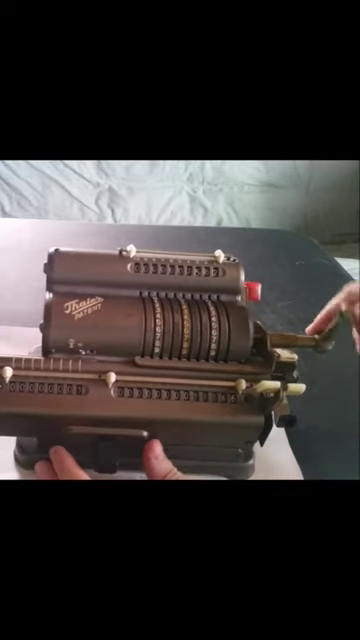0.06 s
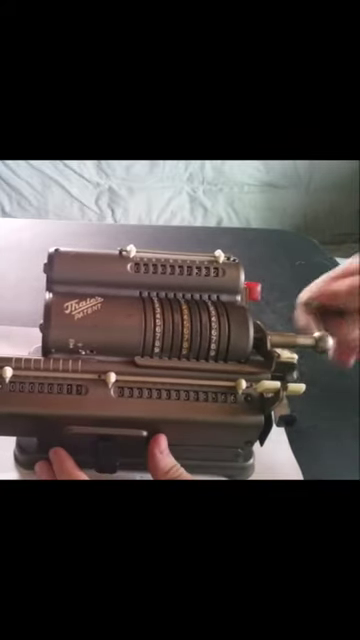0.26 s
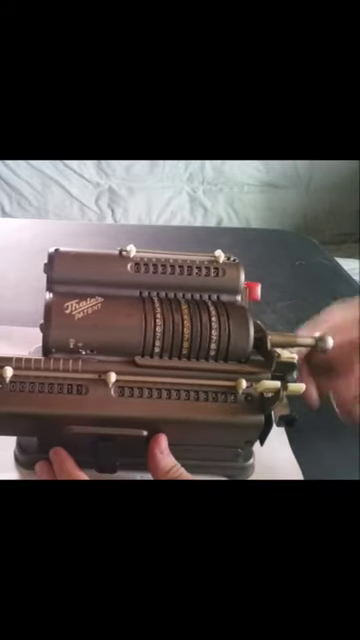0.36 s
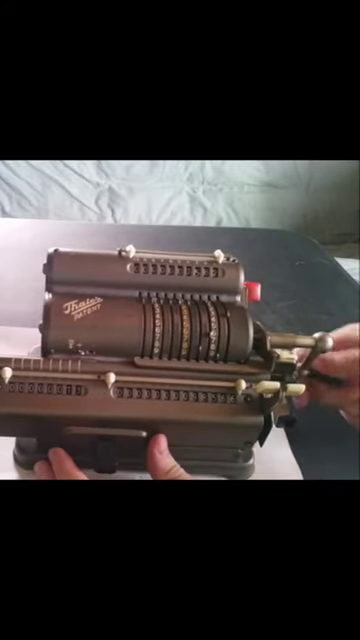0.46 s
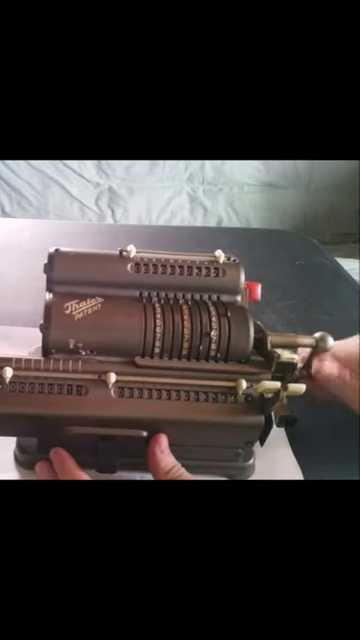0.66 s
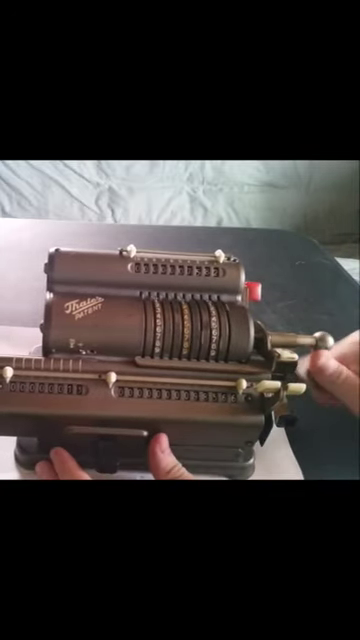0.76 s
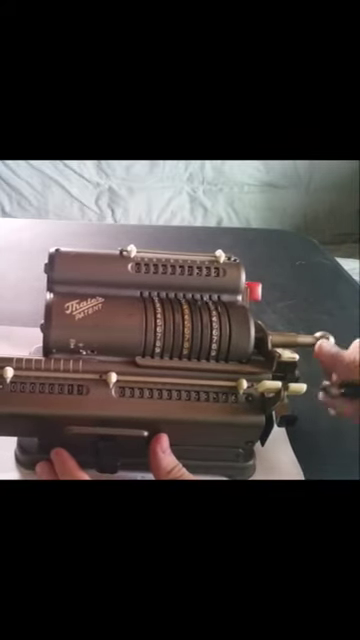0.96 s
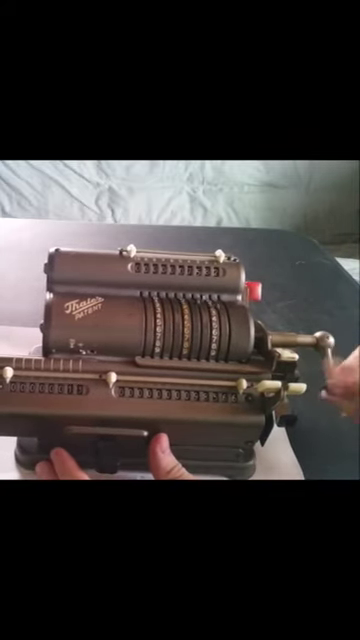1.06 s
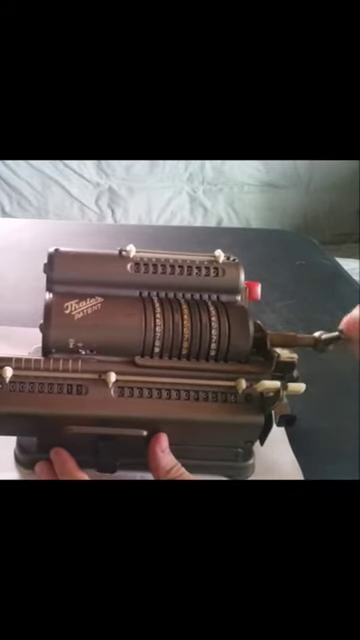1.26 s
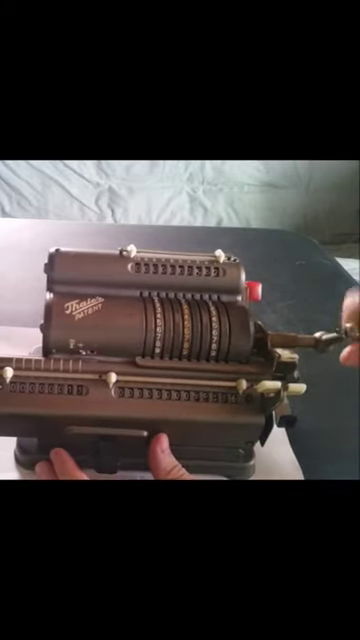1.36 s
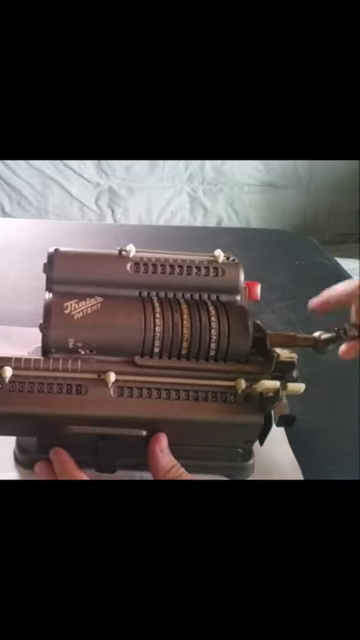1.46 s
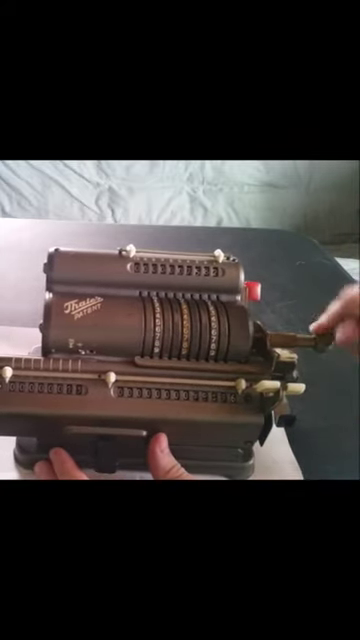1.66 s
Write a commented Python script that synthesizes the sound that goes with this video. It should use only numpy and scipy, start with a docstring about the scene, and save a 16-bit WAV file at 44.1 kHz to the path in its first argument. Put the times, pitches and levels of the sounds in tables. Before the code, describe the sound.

Close up on a desk in a quiet room, a mechanical calculator's crank turns with a quick metallic ratcheting and ends in a ringing clunk. Then come a few softer clicks and a brief scrape as the handle latches.

```python
"""Hand-cranked calculator

A mechanical calculator, close up on a desk in a small quiet room. One turn of the crank drags gears
and pawls through a dense rattle and ends in a heavy clunk against the stop; then the handle is shifted
and latched with lighter clicks. Each click is a crack of noise plus the ring of frame, casing and small
steel parts. Underneath, the hand rubs, the machine rocks on the desk and the room hums faintly."""
import sys
import numpy as np
from scipy import signal
from scipy.fft import rfft, irfft, next_fast_len
from scipy.io import wavfile
from scipy.ndimage import map_coordinates

SR = 44100
rng = np.random.default_rng(int(sys.argv[2]) if len(sys.argv) > 2 else 0)


def to_wav(sig):
    """Store sig (one row per channel, or 1-D mono) as 16-bit WAV at the path in sys.argv[1].

    Samples outside -1..1 are clipped; the rate is SR.
    """
    pcm = np.clip(np.atleast_2d(sig), -1, 1) * 32767
    pcm = np.round(pcm).astype(np.int16)
    wavfile.write(sys.argv[1], SR, pcm.T)  # frames by channels


N = 74970

# Table levels are relative; spectra give level per hertz.
# room tone: f/Hz, level/dB
AIR_SPECTRUM = [(20, 14), (123, -3), (262, 1.5), (1060, 3.5), (1400, -24), (3000, -40), (6700, -18),
                (8000, -36), (16000, -38)]
# fader ride of the rubbing hand: t/s, level/dB
RUB_ENVELOPE = [(0, -66), (.055, -60), (.17, -47), (.68, -45.5), (.76, -51), (.83, -55.5), (.86, -56.5),
                (.92, -54.5), (1.1, -51.5), (1.32, -57.5), (1.36, -53), (1.5, -54), (1.62, -55.5),
                (1.7, -60)]
# dull colour of the rub: f/Hz, level/dB
RUB_SPECTRUM = [(60, -20), (110, 0), (200, -1.5), (320, -4.5), (520, -8.5), (1020, -3.5), (1400, -15.5),
                (4500, -26.5), (7300, -22.5), (9000, -39), (15000, -34.5)]
# pawl, lever and latch clicks: t/s, steel/dB, frame/dB, casing/dB, sizzle/dB, casing pitch/Hz
CLICKS = [(0.0903, -56, -40, -37.5, -82, 910), (0.1074, -34.5, -42, -36, -70, 1000),
          (0.1395, -48, -41, -37, -70, 820), (0.1897, -29, -32, -32.5, -47, 1560),
          (0.199, -28.5, -34, -32.5, -33, 890), (0.2372, -27, -27.5, -24.5, -27, 770),
          (0.2448, -29, -30.5, -24, -29, 810), (0.27, -26.5, -64, -27, -25, 990),
          (.302, -39, -38, -40, -27.5, 750), (.329, -28, -51, -34, -27, 840),
          (0.337, -35, -31.5, -24, -43, 886), (0.3581, -31.5, -27, -24.5, -31, 920),
          (.3774, -35, -26.5, -27, -27.5, 730), (0.3911, -27, -42, -28, -44, 780),
          (0.44, -54, -31, -33.5, -40, 680), (.449, -52, -31.5, -25, -38, 784),
          (.4608, -24, -34.5, -33, -27.5, 730), (0.5269, -52, -35, -30.5, -62, 1000),
          (.541, -35, -40, -30, -34, 790), (0.5533, -28.5, -33, -27, -27.5, 730),
          (0.8478, -72, -43, -43, -82, 950), (0.935, -67, -53, -40, -83, 990),
          (0.9444, -31, -38.5, -31.5, -38, 960), (0.9519, -47, -36.5, -37.5, -43, 2060),
          (0.9671, -41, -34.5, -32, -55, 1010), (0.9809, -37.5, -45, -36.5, -53, 2080),
          (1.151, -43.5, -79, -63, -64, 770), (1.2838, -72, -48, -49, -84, 890),
          (1.4112, -39, -38, -27.5, -40.5, 1230), (1.4175, -38.5, -33, -32.5, -43.5, 1220),
          (1.514, -64, -65, -45, -78, 1070), (1.538, -48.5, -68, -39, -57, 1320),
          (1.647, -65, -50, -48, -80, 1030)]
# trims on all clicks and on all rattles: steel/dB, frame/dB, casing/dB, sizzle/dB
CLICK_TRIM = [-5.5, -3, -4.5, -4]
RATTLE_TRIM = [-3.3, -12, -10, -4.8]
# a contact's crack as steel snap, top-end sizzle and casing knock: f/Hz, level/dB
STEEL_SPECTRUM = [(1000, -38), (1700, -2), (2500, -7.5), (3500, -9), (4600, -2.5), (5550, 0), (6400, -3),
                  (7500, 0), (8400, -9), (10000, -44)]
SIZZLE_SPECTRUM = [(6500, -28), (8500, -3.5), (10000, -2.5), (12000, 1.5), (14000, -1), (15500, -2.5)]
KNOCK_SPECTRUM = [(100, -17), (250, -13), (550, -8), (900, 5.5), (1100, -1), (1350, -12), (1750, -4),
                  (3300, -18), (6000, -47.5)]
# ring of the heavy frame, sheet-metal casing and small steel parts: f/Hz, level/dB, t60/s
FRAME_MODES = [(169, -4.5, 0.22), (216.1, 2, 0.19), (304, -3, 0.15), (338.4, 1, 0.16), (449, -11, 0.082)]
CASING_MODES = [(545, -37, 0.015), (690, -2, 0.098), (762.7, 1.5, 0.085), (805.5, -4, 0.11),
                (929, 2.5, 0.022), (1011, -6.5, 0.072), (1087, -0.5, 0.043), (1230, -7, 0.063),
                (1519, -4.5, 0.055), (1609, -7.5, 0.053), (2039, -13, 0.09)]
STEEL_MODES = [(5545, 2, .12), (7235, -6, 0.16), (4570, 7, 0.01)]
# jolts that set loose wheels and plates chattering: t/s, level/dB, t60/s
JOLTS = [(0.106, -41, 0.033), (.585, -37, .17), (.9445, -49, 0.23)]
# harsh colour of that chatter: f/Hz, level/dB
JANGLE_SPECTRUM = [(1400, -32), (1600, -4), (2100, 2), (2700, -3), (3900, -9), (5600, -41)]
# rattle envelopes, one for each movement: t/s, steel/dB, frame/dB, casing/dB, sizzle/dB
CRANK_TURN = [(.115, -58, -58, -69, -70), (.178, -59.5, -51, -51, -60), (.2, -55, -55, -33.5, -45),
              (.228, -41, -49, -37.5, -40.5), (.245, -42.5, -48, -35, -41), (.305, -39.5, -35, -33.5, -35),
              (.375, -39, -41, -31, -34.5), (.428, -50.5, -48, -53, -49), (.465, -41.5, -52, -41, -39),
              (.52, -54.5, -45, -42, -65), (.555, -47, -52, -39, -44), (.575, -43, -44, -31, -37)]
STOP_SHAKE = [(.58, -44, -34, -41, -38.5), (.62, -49.5, -44, -36, -57), (.66, -70, -50, -60, -76)]
HANDLE_SHIFT = [(0.94, -59, -70, -56, -61), (0.984, -48.5, -39, -44, -48), (1.05, -74, -79, -71, -72)]
HANDLE_LATCH = [(1.36, -65, -60, -54, -82), (1.4, -60.5, -42, -42, -65), (1.426, -48.5, -43, -39, -50.5),
                (1.476, -68, -71, -62, -69), (1.525, -72, -55, -61, -81), (1.55, -64.5, -64, -47, -72),
                (1.585, -74, -61, -64, -78)]
# the machine rocks on the desk: t/s, level/dB, f/Hz
THUMPS = [(0.251, -26.5, 215.5), (0.442, -21, 178), (0.684, -38, 178), (0.848, -41.5, 205),
          (0.951, -36, 181), (.96, -39.5, 322), (1.415, -38, 211.6)]
# the crank hits its stop and rebounds: t/s, level/dB
STOP_HITS = [(0.5815, -17), (0.5844, -7), (0.5897, -19), (0.6008, -18.5), (0.6181, -24)]
# ring of the stop and of the handle's pin: f/Hz, level/dB, t60/s
STOP_MODES = [(174, -24, .34), (347, -11.5, .099), (453, -11.5, .065), (835, -14, .16), (948, 0, .039),
              (1014, -9, .052), (1082, -8, .06), (1144, -25, .22), (1501, -15, .047), (994, -28, .62)]
PIN_MODES = [(769, 0, 0.047), (4700, -11, 0.017)]
# colour of the grinding handle: f/Hz, level/dB
SCRAPE_SPECTRUM = [(200, -20), (320, 2.5), (470, 8.5), (800, 3), (1300, -14), (4000, -36), (7500, -10),
                   (9000, -40)]
# decay of the room's tail: f/Hz, t60/s
ROOM_DECAY = [(150, 0.33), (1000, 0.17), (5000, 0.31), (14000, 0.36)]
# how alike left and right are: f/Hz, correlation
STEREO_LIKENESS = [(30, 0.63), (150, 0.8), (1000, 0.48), (2200, 0.062), (4500, 0.027)]
# pan across the spectrum: f/Hz, left minus right/dB
STEREO_TILT = [(100, 2.5), (210, 0), (500, 2.5), (1150, 5.5), (3000, 2.5), (4200, 8.5), (5300, 15),
               (7400, 16), (8700, 5.5), (10000, -4.5), (14000, -4.5)]

CRACK_RISE_S, CRACK_T60, KNOCK_T60 = 0.00073, 0.022, 0.019
CONTACT_ENERGY_S = 0.0039  # a 0 dB crack or ring has the energy of this long at rms 1
RATTLE_PER_S, RATTLE_SCATTER_DB = 560, 2.6


def amp(db):
    """Decibels to gain."""
    return 10 ** (np.asarray(db) / 20)


def unit(x):
    """Scale to rms 1."""
    return x / np.sqrt(np.mean(x ** 2) + 1e-20)


def curve_at(points, hz):
    """Read a curve of (f/Hz, value) points on a log frequency axis."""
    freqs, values = np.transpose(points)
    return np.interp(np.log(hz + 1), np.log(freqs + 1), values)


def filtered(x, response):
    """Zero-phase EQ with the gain response(hz)."""
    size = next_fast_len(x.shape[-1] + 8192)
    return irfft(rfft(x, size) * response(np.fft.rfftfreq(size, 1 / SR)), size)[..., :x.shape[-1]]


def coloured(x, spectrum, size=1024):
    """Minimum-phase EQ: attacks stay sharp and white noise keeps its power."""
    cepstrum = irfft(np.log(amp(curve_at(spectrum, np.fft.rfftfreq(size, 1 / SR)))))
    cepstrum[1:size // 2] *= 2
    cepstrum[size // 2 + 1:] = 0
    impulse = irfft(np.exp(rfft(cepstrum)))
    return signal.oaconvolve(x, impulse[None] / np.linalg.norm(impulse), axes=1)[:, :N]


def stereo(x):
    """Two unrelated signals become left and right: narrow in the bass, wide in the treble."""
    def mid_side_gains(hz):
        angle = np.arccos(np.clip(curve_at(STEREO_LIKENESS, hz), -1, 1)) / 2
        return np.array([np.cos(angle), np.sin(angle)])
    mid, side = filtered(x, mid_side_gains)
    return np.array([mid + side, mid - side])


def noise(spectrum):
    """Stereo noise of rms 1 with the given colour."""
    white = rng.standard_normal((2, N))
    return unit(stereo(filtered(white, lambda hz: amp(curve_at(spectrum, hz)))))


def add(track, start_s, sound):
    """Mix a sound in at its cue."""
    i = int(np.clip(round(start_s * SR), 0, N - 1))
    track[..., i:i + sound.shape[-1]] += sound[..., :N - i]


def room_tone(air_db=-60.5, hum_hz=91.9, hum_db=-63):
    """A bed of quiet air with a low hum."""
    hum = np.sqrt(2) * np.sin(2 * np.pi * hum_hz * np.arange(N) / SR)
    return amp(air_db) * noise(AIR_SPECTRUM) + amp(hum_db) * hum


def hand_rub(slips_per_s=70, rough_db=1.5):
    """Hand and handle rub on the machine in small uneven slips."""
    t = np.arange(N) / SR
    slips = map_coordinates(rng.standard_normal(1024), [t * slips_per_s])
    level_db = np.interp(t, *np.transpose(RUB_ENVELOPE)) + rough_db * slips
    return amp(level_db) * noise(RUB_SPECTRUM)


def cracks(times, levels_db, t60, spectrum):
    """The attack of each contact: a short dying burst of coloured noise."""
    bursts, t = np.zeros((2, N)), np.arange(SR // 50) / SR
    envelope = amp(-60 * t / t60) * (1 - np.exp(-t / CRACK_RISE_S))
    envelope *= np.sqrt(CONTACT_ENERGY_S * SR / np.sum(envelope ** 2))
    for start_s, gain in zip(times, amp(levels_db)):
        add(bursts, start_s, gain * envelope * rng.standard_normal((2, len(t))))
    return coloured(bursts, spectrum)


def rings(times, levels_db, modes, focus_hz=None, focus_db=13, focus_octaves=0.23, scatter_db=3.1):
    """The body of each contact: the modes ring in a fresh mix, boosted near focus_hz if given."""
    hz, db, t60 = np.transpose(modes)
    scatter, polarity = rng.standard_normal((len(times), 2, len(hz))).swapaxes(0, 1)
    mix_db = db + scatter_db * scatter
    if focus_hz is not None:
        octaves_off = np.log2(hz / focus_hz[:, None])
        mix_db += focus_db * np.exp(-(octaves_off / focus_octaves) ** 2)
    decay_rate = np.log(1000) / t60
    energy = np.sum(amp(mix_db) ** 2 / (4 * decay_rate), axis=1, keepdims=True)
    kicks = amp(mix_db + levels_db[:, None]) * np.sign(polarity) * np.sqrt(CONTACT_ENERGY_S / energy)
    onsets = np.clip(np.round(times * SR).astype(int), 0, N - 1)
    out = np.zeros(N)
    for kick, angle, radius in zip(kicks.T, 2 * np.pi * hz / SR, np.exp(-decay_rate / SR)):
        drive = np.bincount(onsets, kick, N) + 1e-20
        resonator = [0, radius * np.sin(angle)], [1, -2 * radius * np.cos(angle), radius ** 2]
        out += signal.lfilter(*resonator, drive)
    return out


def contacts(cues, knock_db=-6.5, steel_ring_db=-12):
    """Metal meets metal: each cue, laid out as in CLICKS, cracks and rings frame, casing and steel."""
    times, steel_db, frame_db, casing_db, sizzle_db, pitch_hz = cues.T
    snap = cracks(times, steel_db, CRACK_T60, STEEL_SPECTRUM)
    sizzle = cracks(times, sizzle_db, CRACK_T60, SIZZLE_SPECTRUM)
    knock = cracks(times, casing_db + knock_db, KNOCK_T60, KNOCK_SPECTRUM)
    frame = rings(times, frame_db, FRAME_MODES)
    casing = rings(times, casing_db, CASING_MODES, focus_hz=pitch_hz)
    steel = rings(times, steel_db + steel_ring_db, STEEL_MODES)
    return stereo(snap + sizzle + knock) + frame + casing + steel


def click_cues():
    """Cues for the distinct hits of pawls, levers and the handle latch."""
    cues = np.array(CLICKS)
    cues[:, 1:5] += CLICK_TRIM
    return cues


def jangle():
    """After a jolt the loose wheels and plates chatter harshly and settle."""
    chatter = np.zeros((2, N))
    for start_s, db, t60 in JOLTS:
        delays = np.arange(0, t60, 1 / RATTLE_PER_S)
        levels_db = db - 60 * delays / t60 + RATTLE_SCATTER_DB * rng.standard_normal(len(delays))
        chatter += cracks(start_s + delays, levels_db, KNOCK_T60, JANGLE_SPECTRUM)
    return stereo(chatter)


def rattle_cues(movement, centre_hz=984, spread_octaves=0.64):
    """Cues for gear teeth and loose parts, chattering unevenly while the mechanism moves."""
    key_times, *envelopes = np.transpose(movement)
    grid = np.arange(key_times[0], key_times[-1], 1 / RATTLE_PER_S)
    jitter, accent, detune = rng.standard_normal((SR // 100, 3))[:len(grid)].T
    times = grid + .3 * jitter / RATTLE_PER_S
    levels_db = np.transpose([np.interp(times, key_times, envelope) for envelope in envelopes])
    levels_db += RATTLE_SCATTER_DB * accent[:, None] + RATTLE_TRIM
    return np.column_stack([times, levels_db, centre_hz * 2 ** (spread_octaves * detune)])


def thumps(rise_s=0.015, trim_db=-6):
    """The machine rocks on the desk: soft low thumps that swell and die without a click."""
    out, t = np.zeros(N), np.arange(SR // 3) / SR
    swell = (t / rise_s * np.exp(1 - t / rise_s)) ** 2
    for start_s, db, hz in THUMPS:
        add(out, start_s, amp(db + trim_db) * swell * np.sin(2 * np.pi * hz * t))
    return out


def struck_once(modes, rise_s):
    """One hit on a metal part: its modes ring out as dying sines."""
    t = np.arange(SR // 2) / SR
    ring = sum(amp(db - 60 * t / t60) * np.sin(2 * np.pi * hz * t) for hz, db, t60 in modes)
    return (1 - np.exp(-t / rise_s)) * ring


def clunk(ring_db=-6, knock_db=-31, snap_db=-21):
    """The crank slams into its stop and rebounds; the first touch adds a snap of steel."""
    body, ring = np.zeros(N), struck_once(STOP_MODES, rise_s=0.00044)
    for start_s, db in STOP_HITS:
        add(body, start_s, amp(db + ring_db) * ring)
    times, levels_db = np.transpose(STOP_HITS)
    knock = cracks(times, levels_db + knock_db, KNOCK_T60, KNOCK_SPECTRUM)
    snap = cracks(times[:1], levels_db[:1] + snap_db, CRACK_T60, STEEL_SPECTRUM)
    return body + stereo(knock + snap)


def desk_boom(hz=69.8, db=-44.5, t60=0.47):
    """The desk booms on one low note under the clunk."""
    out, t = np.zeros(N), np.arange(SR // 3) / SR
    add(out, STOP_HITS[0][0], amp(db - 60 * t / t60) * np.sin(2 * np.pi * hz * t))
    return out


def pin_ping(start_s=1.1508, db=-32):
    """The handle's pin touches once and rings."""
    out = np.zeros(N)
    add(out, start_s, amp(db) * struck_once(PIN_MODES, CRACK_RISE_S))
    return out


def handle_scrape(start_s=1.339, length_s=0.103, db=-46):
    """The handle grinds toward its latch in one short stroke of noise."""
    t = np.arange(N) / SR
    stroke = np.interp(t - start_s, [0, .003, length_s, length_s + .02], [0, 1, 1, 0])
    return amp(db) * stroke * noise(SCRAPE_SPECTRUM)


def room_reverb(x, tail_db=-7.5, early_db=-7.5, early_t60=0.11):
    """The desk and near walls answer at once; the room's tail lingers."""
    hz, frame_times, bins = signal.stft(rng.standard_normal((2, SR // 2)), SR, nperseg=256)
    decay = amp(-60 * frame_times / curve_at(ROOM_DECAY, hz)[:, None])
    tail = signal.istft(bins * decay, SR, nperseg=256)[1]
    t = np.arange(tail.shape[1]) / SR
    early = rng.standard_normal(tail.shape) * amp(-60 * t / early_t60)
    impulse = stereo(amp(tail_db) * unit(tail) + amp(early_db) * unit(early)) / np.sqrt(len(t))
    predelayed = np.pad(impulse, ((0, 0), (SR // 300, 0)))
    return signal.fftconvolve(x, predelayed, axes=1)[:, :N]


def pan_gains(hz):
    """Constant-power pan: mids and lower treble lean left, the very top leans right."""
    sides = amp(curve_at(STEREO_TILT, hz) * np.array([[.5], [-.5]]))
    return sides / np.sqrt(np.mean(sides ** 2, axis=0))


def scene(bass_cut_hz=95):
    """The mix: the machine, which radiates little deep bass, with its desk, the hand and the room."""
    rattles = [rattle_cues(move) for move in (CRANK_TURN, STOP_SHAKE, HANDLE_SHIFT, HANDLE_LATCH)]
    cues = np.vstack([click_cues(), *rattles])
    metal = contacts(cues) + clunk() + jangle() + pin_ping() + handle_scrape()
    machine = signal.sosfilt(signal.butter(2, bass_cut_hz, "high", fs=SR, output="sos"), metal)
    mix = machine + room_reverb(machine) + thumps() + desk_boom() + hand_rub()
    return filtered(mix, pan_gains) + room_tone()


def record(dry, top_hz=15650):
    """A brick-wall high cut on the master."""
    return filtered(dry, lambda hz: 1 / np.sqrt(1 + (hz / top_hz) ** 160))


dry = scene()
out = record(dry)
to_wav(out)
```